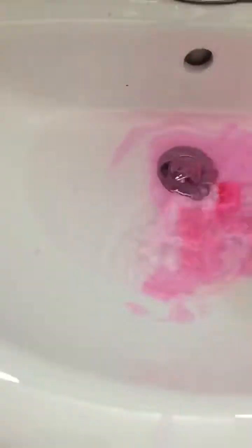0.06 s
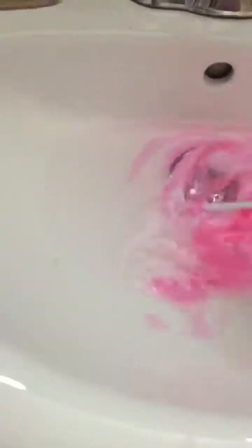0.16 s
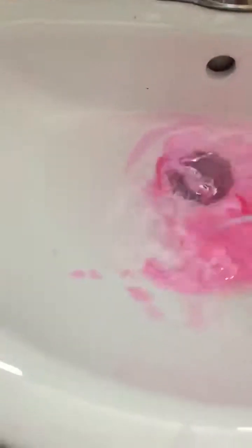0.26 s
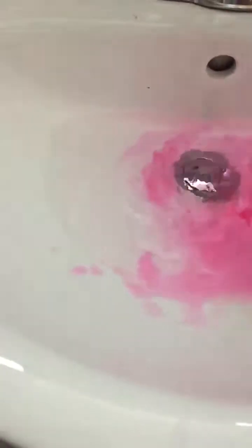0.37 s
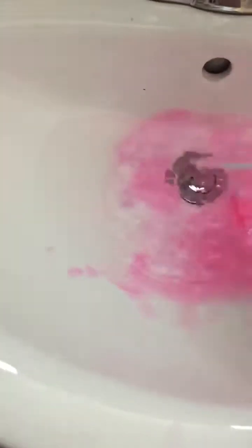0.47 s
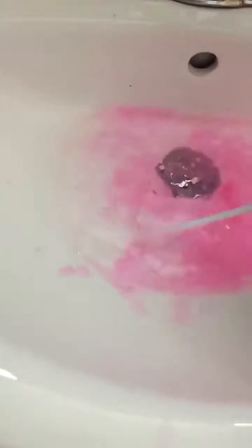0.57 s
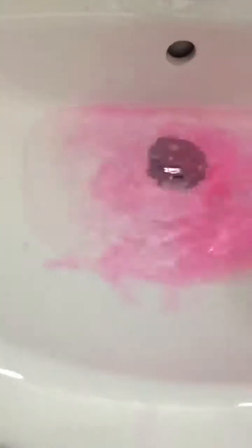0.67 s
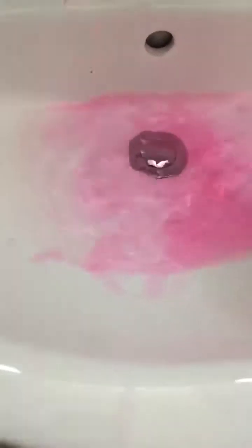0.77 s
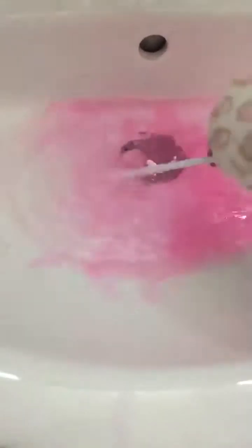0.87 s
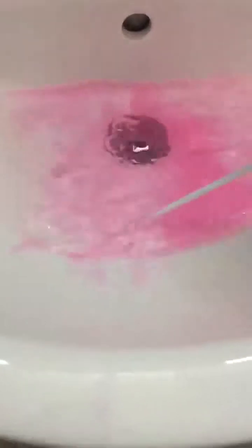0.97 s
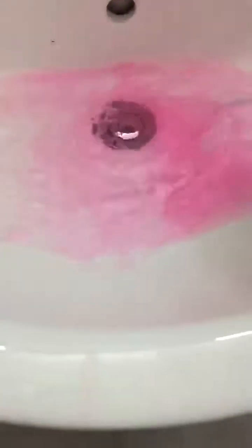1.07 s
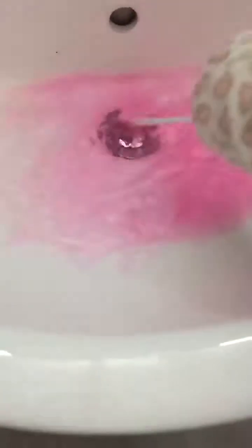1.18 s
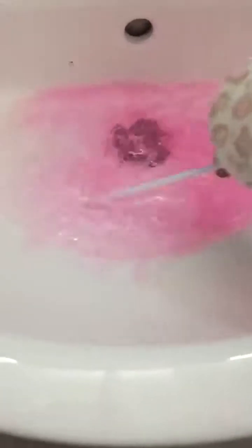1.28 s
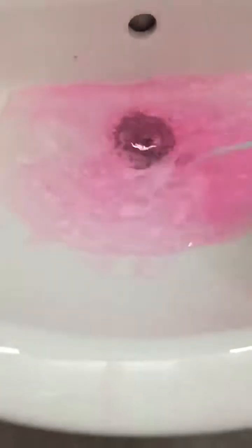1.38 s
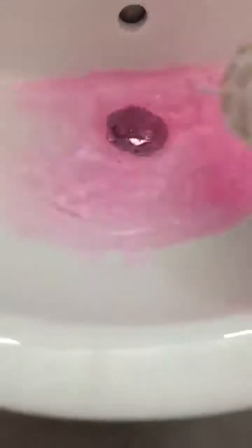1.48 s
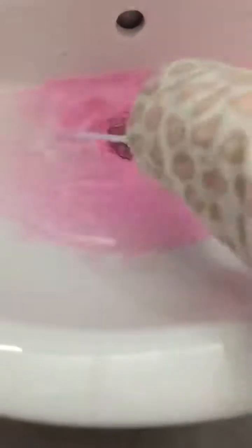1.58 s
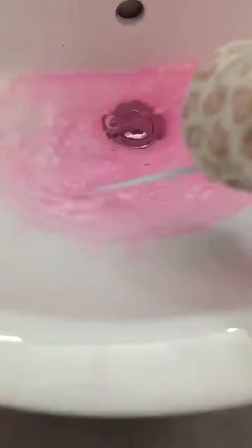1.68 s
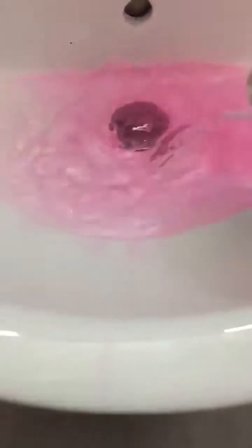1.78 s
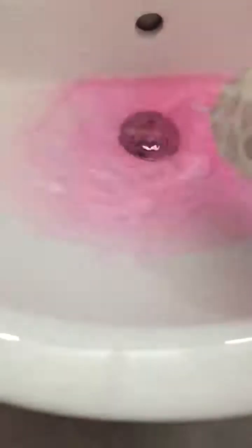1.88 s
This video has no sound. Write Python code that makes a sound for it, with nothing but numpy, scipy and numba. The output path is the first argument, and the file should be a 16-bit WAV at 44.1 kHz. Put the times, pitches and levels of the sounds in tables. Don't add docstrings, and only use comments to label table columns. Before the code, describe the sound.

Close phone pickup of water splashing in a bathroom basin: a crack and plops early, then clusters of bubbly bloops, short slosh and fizz, ending in sparse small drips, with slight tiled-room echo and faint hum.

```python
import sys
import numpy as np
from scipy import signal
from scipy.fft import rfft, irfft
from scipy.io import wavfile
from numba import njit

SR = 44100
rng = np.random.default_rng(int(sys.argv[2]) if len(sys.argv) > 2 else 0)


def transcribe(u):
    v = np.clip(np.atleast_2d(u).T, -1, 1)
    q = np.round(v * 32767).astype(np.int16)
    wavfile.write(sys.argv[1], SR, q)


def gain_from_db(level_db):
    decades = np.asarray(level_db, float) / 20
    return 10 ** decades


N = 85995


def band(x, hz, octaves):
    edges = np.clip(hz * 2 ** (np.array([-octaves, octaves]) / 2), 20, SR * 0.45)
    return signal.sosfilt(signal.butter(2, edges, "bandpass", fs=SR, output="sos"), x)


def unit(x):
    return x / np.sqrt(np.mean(x ** 2))


def add(out, start_s, piece):
    i = max(int(start_s * SR), 0)
    out[i:i + len(piece)] += piece[:N - i]


def blur(count, width_hz):
    settle = 2000
    low_pass = signal.butter(2, width_hz / 2, fs=SR, output="sos")
    a, b = signal.sosfilt(low_pass, rng.standard_normal((2, count + settle)))[:, settle:]
    return (a + 1j * b) / np.sqrt(2 * width_hz / SR)


@njit
def grains(count, start, hz, size, cycles, rise, rate):
    out = np.zeros(count)
    for k in range(len(start)):
        n, phase = cycles[k] * rate / hz[k], 0.
        for j in range(min(int(2 * n), count - start[k])):
            phase += 2 * np.pi * min(hz[k] * (1 + rise[k] * j / n) / rate, 0.45)
            attack = 1 - np.exp(-j * 3 * hz[k] / rate)
            out[start[k] + j] += size[k] * np.exp(-3.45 * j / n) * attack * np.sin(phase)
    return out


def ring(start_s, pitch_hz, level_db, cycles, rise):
    start = (start_s * SR).astype(np.int64)
    return grains(N, start, 1. * pitch_hz, gain_from_db(level_db), cycles + 0 * pitch_hz, rise + 0 * pitch_hz, 1. * SR)


# pitch_hz [Hz], level_db [dB per Hz]
HUM_SPECTRUM = [
    (15, -33),
    (25, -7),
    (2500, -4),
    (4800, -10),
    (7310, -13),
    (11600, -9),
    (16000, -22),
]


def hum():
    f = np.maximum(np.fft.rfftfreq(N, 1 / SR), 1)
    hz, level_db = np.array(HUM_SPECTRUM).T
    colour = gain_from_db(np.interp(np.log(f), np.log(hz), level_db))
    return unit(irfft(rfft(rng.standard_normal(N)) * colour, N)) * gain_from_db(-63)


# start_s [s], length_s [s], strength_db [dB],
# depth_octaves [octaves the bubbles sink], spray_db [dB]
SURGES = [(0.03, 0.025, -44, -0.47, 0.1), (0.21, 0.043, -38, 0.14, .1), (.27, .03, -40, .1, .1),
          (0.371, 0.082, -41, -0.24, .1), (0.575, 0.03, -41, -.3, .1), (.61, .06, -35, -.2, .1),
          (0.716, 0.03, -51, -0.33, .1), (.915, 0.04, -34, 0.58, -2), (.96, .058, -31, .3, .1),
          (1.075, 0.045, -50, 0.094, .1), (1.262, .065, -37, -0.1, -4), (1.352, .035, -32, -.7, -8),
          (1.42, .07, -42, -.2, -5), (1.59, 0.085, -42, 0.034, .1), (1.805, 0.055, -44, -0.19, .1)]


def stirring():
    rise_s, fall_s = 0.008, 0.016
    trickle_power, trickle_depth, trickle_spray_db = gain_from_db(2 * -57), -0.7, 6
    t = np.arange(N) / SR
    start_s, length_s, strength_db, depth, spray_db = np.array(SURGES).T[:, :, None]
    attack = np.clip((t - start_s) / rise_s, 0, 1) ** 2
    decay = np.exp(-np.maximum(t - start_s - length_s, 0) / fall_s)
    power = gain_from_db(2 * strength_db) * attack * decay
    total = power.sum(0) + trickle_power
    mean_depth = ((power * depth).sum(0) + trickle_power * trickle_depth) / total
    mean_spray_db = ((power * spray_db).sum(0) + trickle_power * trickle_spray_db) / total
    return 10 * np.log10(total), mean_depth, mean_spray_db


def rumble():
    hz, octaves = 137, 1.98
    strength_db, depth, _ = stirring()
    low = unit(band(band(rng.standard_normal(N), hz, octaves), hz, octaves))
    return low * (gain_from_db(-31.5 + strength_db + 8 * depth) + gain_from_db(-77))


def swarm(count, hz, octaves, cycles, scatter_db, depth):
    luck = np.clip(rng.standard_normal((count, 4)), -2.2, 2.2)
    at = (rng.random(count) * (N - 1)).astype(int)
    strength_db, stir_depth, _ = stirring()
    pitch_hz = np.clip(hz * 2 ** (octaves * luck[:, 0] - depth * stir_depth[at]), 300, 16000)
    level_db = scatter_db * luck[:, 3]
    overlap = np.mean(gain_from_db(2 * level_db) * cycles / pitch_hz) * count / (N / SR) / 14
    level_db = level_db - 10 * np.log10(overlap) + strength_db[at]
    return ring(at / SR, pitch_hz, level_db, cycles * 2 ** (0.5 * luck[:, 1]), 0.2 + 0.26 * luck[:, 2])


def slosh():
    strength_db, _, spray_db = stirring()
    small = gain_from_db(-3) * swarm(count=1100, hz=1500, octaves=0.603, cycles=14.2, scatter_db=5, depth=1)
    froth = gain_from_db(-12.5) * swarm(count=1500, hz=2900, octaves=0.45, cycles=11, scatter_db=5.5, depth=0)
    fizz = gain_from_db(-12) * swarm(count=2000, hz=7600, octaves=0.665, cycles=11, scatter_db=7, depth=0)
    flicker = gain_from_db(4.0 * unit(band(rng.standard_normal(N), 70, 3)))
    spray = gain_from_db(-20) * unit(band(rng.standard_normal(N), 5500, 2.4) * flicker)
    return small + froth + gain_from_db(spray_db) * (fizz + spray * gain_from_db(strength_db))


# start_s [s], length_s [s], first_hz [Hz], last_hz [Hz], level_db [dB]
HOLLOW_WHISTLES = [(0, .045, 2250, 2250, -52), (.045, .035, 2300, 2450, -42), (.075, .085, 2300, 1850, -50),
                   (.02, .045, 3700, 3600, -52), (.745, .025, 1000, 1600, -52),
                   (.765, .055, 1750, 1850, -44), (.79, .06, 2900, 3300, -56),
                   (1.105, .05, 2500, 1900, -47), (1.475, .04, 1250, 2100, -45),
                   (1.51, .05, 1800, 1800, -50), (1.55, .04, 2000, 2250, -47),
                   (1.655, .03, 3100, 2600, -46), (1.665, .04, 1300, 1250, -45),
                   (1.77, .03, 4400, 4300, -46)]


def hollows():
    width_hz, edge = 260, 0.25
    out = np.zeros(N)
    for start_s, length_s, first_hz, last_hz, level_db in HOLLOW_WHISTLES:
        u = np.linspace(0, 1, int(length_s * SR))
        phase = 2 * np.pi * np.cumsum(first_hz + (last_hz - first_hz) * u) / SR
        shape = np.clip(np.minimum(u, 1 - u) / edge, 0, 1)
        whistle = np.real(blur(len(u), width_hz) * np.exp(1j * phase))
        add(out, start_s, gain_from_db(level_db) * shape * whistle)
    return out


# start_s [s], length_s [s], first_hz [Hz], last_hz [Hz], peak_db [dB]
AIR_POCKETS = [(0.035, 0.018, 640, 820, -40), (0.056, 0.026, 814, 1110, -43),
               (0.181, 0.035, 726, 1080, -49.5), (.209, 0.014, 985, 1330, -18.5),
               (0.345, 0.017, 630, 650, -41.5), (.370, 0.017, 652, 670, -29.5),
               (0.377, 0.023, 902, 990, -33), (0.375, 0.018, 1264, 2330, -40),
               (0.403, 0.021, 1242, 2310, -28), (0.634, .013, 1865, 2840, -27),
               (.866, 0.023, 614, 870, -40.5), (0.869, 0.021, 2403, 1980, -51),
               (0.899, 0.024, 1082, 1675, -26), (.900, 0.019, 670, 1284, -25),
               (0.929, 0.017, 760, 900, -27.5), (1.3565, .006, 2600, 3700, -15),
               (1.008, .018, 700, 620, -27), (.975, 0.016, 514, 514, -19), (0.996, 0.022, 543, 773, -28.5),
               (1.030, 0.014, 474, 546, -40), (1.075, 0.037, 888, 2240, -48),
               (1.223, .038, 607, 1174, -38.5), (1.734, 0.059, 497, 710, -47),
               (1.807, 0.02, 908, 1083, -35)]


def pockets():
    attack_s, close_s, fade_db, bend, flutter_db = 0.0008, 0.001, -2, 1.478, 2.5
    out = np.zeros(N)
    flutter = unit(band(rng.standard_normal(N), 125, 1.35))
    for start_s, length_s, first_hz, last_hz, peak_db in AIR_POCKETS:
        t = np.arange(int((length_s + 0.0102) * SR)) / SR
        u = np.clip(t / length_s, 0, 1)
        shape = np.clip(t / attack_s, 0, 1) * np.exp(-np.maximum(t - length_s, 0) / close_s)
        wobble = np.resize(flutter[int(start_s * SR):], len(t))
        glide_hz = first_hz + (last_hz - first_hz) * u ** bend
        phase = 2 * np.pi * np.cumsum(glide_hz * (1 + 0.01 * wobble[::-1])) / SR
        level = gain_from_db(peak_db + fade_db * u + flutter_db * wobble)
        add(out, start_s, level * shape * np.sin(phase))
    return out


# start_s [s], peak_db [dB], pitch_hz [Hz]
DROPLETS = [(0.0377, -25.5, 6700), (0.453, -26.5, 12300), (0.5136, -18.5, 6050), (0.6498, -22.5, 8700),
            (0.6665, -25.5, 4720), (0.7385, -26, 11900), (0.8419, -36, 11700), (0.9307, -30, 8990),
            (0.9382, -24.5, 5060), (1.064, -28, 10900), (1.092, -39, 4530), (1.1115, -25, 5940),
            (1.2036, -26, 8930), (1.3017, -22, 4830), (1.3634, -17, 7200), (1.5237, -34, 11400),
            (1.5924, -28, 9300), (1.6064, -30.5, 8870), (1.615, -24, 5980), (1.769, -26, 3950),
            (1.816, -31, 3920), (1.8584, -33.5, 4540), (1.932, -24, 4670)]


def droplets():
    start_s, peak_db, pitch_hz = np.array(DROPLETS).T
    out = ring(start_s, pitch_hz, peak_db, 22, 0.018)
    t = np.arange(400) / SR
    for start_s, peak_db, pitch_hz in DROPLETS:
        noise = rng.standard_normal(len(t)) * np.exp(-t / 0.0032)
        tick = band(band(noise, pitch_hz * 0.58, 1.2), pitch_hz * 2.2, 2.8)
        add(out, start_s, gain_from_db(peak_db - 7) * tick)
    return out


# start_s [s], pitch_hz [Hz], peak_db [dB], cycles [count to fade 30 dB]
SINGLE_BUBBLES = [(0.056, 3600, -36, 22), (0.974, 2430, -17, 10), (1.301, 2320, -24, 8),
                  (1.47, 700, -32, 16), (1.583, 2300, -35, 10), (.228, 910, -18, 6.7),
                  (0.235, 1500, -16.5, 5.5), (.370, 1550, -24.5, 16), (0.402, 2000, -8, 10.4),
                  (.427, 2450, -21.5, 30), (.446, 1243, -32.5, 20), (.471, 1800, -22, 8.5),
                  (0.584, 1280, -31, 19), (.599, 1460, -22, 4.6), (0.61, 2468, -7, 16),
                  (0.634, 1012, -17.5, 15), (.678, 1785, -23, 13.6), (0.787, 1780, -32, 24),
                  (1.26, 1137, -15, 17), (1.27, 1830, -24, 13), (1.288, 841, -17.5, 9.6),
                  (1.319, 1600, -18.5, 30), (1.356, 2315, -8, 16), (.944, 1000, -23, 9),
                  (.954, 780, -21, 9), (.962, 950, -20, 9), (1.643, 900, -31, 14), (1.426, 2210, -20, 21),
                  (1.442, 1720, -16.5, 13), (1.452, 710, -27.5, 16.3), (1.594, 1095, -20, 21.3),
                  (1.607, 3000, -14.5, 7.7), (1.621, 1500, -24, 8.3), (1.698, 900, -31, 21),
                  (1.809, 1610, -23, 4.8), (1.858, 2050, -35, 22)]


def bubbles():
    start_s, pitch_hz, peak_db, cycles = np.array(SINGLE_BUBBLES).T
    return ring(start_s, pitch_hz, peak_db, cycles, 0.098)


# pitch_hz [Hz], level_db [dB], t60_s [s]
BASIN_MODES = [
    (1349, 2.5, 0.099),
    (3300, -10, 0.08),
    (4430, -2, 0.19),
    (5520, -8, 0.06),
    (7800, -20, 0.06),
    (9400, -20, 0.06),
]
# start_s [s], peak_db [dB], centre_hz [Hz], ring_db [dB of basin ring]
GLAZE_SPLASHES = [(0.21, -30, 5000, -9), (0.2701, -2, 9000, -4), (0.3999, -26.5, 4000, -22),
                  (0.472, -27, 2500, 3), (0.578, -39, 4000, -4), (0.6105, -9, 4500, -9),
                  (0.9737, -5.5, 7500, -9), (1.003, -14.5, 5000, -4), (1.3178, -11, 3800, -5),
                  (1.357, -33, 3000, -9), (1.375, -20, 4000, -27), (1.423, -37, 6000, 4),
                  (1.4431, -25.5, 5000, 1)]


def splashes():
    crack_s, hiss_s = 0.00083, 0.018
    out, t = np.zeros(N), np.arange(int(0.3 * SR)) / SR
    rise = np.clip(t / 0.0011, 0, 1)
    for start_s, peak_db, centre_hz, ring_db in GLAZE_SPLASHES:
        crack = band(rng.standard_normal(len(t)) * rise * np.exp(-t / crack_s), centre_hz, 2.7)
        hiss = unit(band(rng.standard_normal(len(t)), 5000, 2.5)) * rise * np.exp(-t / hiss_s)
        tone = np.zeros(len(t))
        for pitch_hz, level_db, t60_s in BASIN_MODES:
            wave = (0.6 + blur(len(t), 70)) * np.exp(2j * np.pi * pitch_hz * t)
            tone += gain_from_db(level_db) * 1000 ** (-t / t60_s) * np.real(wave)
        splash = crack / np.abs(crack).max() + gain_from_db(-33) * hiss + gain_from_db(-22 + ring_db) * tone
        add(out, start_s, gain_from_db(peak_db) * splash)
    return out


# start_s [s], peak_db [dB], centre_hz [Hz]
GLAZE_TICKS = [(.2274, -28, 5100), (.229, -32, 6600), (.3691, -38, 11400), (.378, -40, 11500),
               (.391, -42, 13500), (.401, -30, 14000), (.4125, -31, 10000), (.4364, -41, 10200),
               (.447, -38, 4600), (.4525, -27, 8500), (.465, -33, 11500), (.482, -34, 14000),
               (.497, -40, 13000), (.5835, -35, 12500), (.591, -36, 8500), (.5995, -31, 7500),
               (.630, -28, 7000), (.668, -30, 9000), (.680, -32, 5600), (.912, -36, 3400),
               (.945, -34, 6200), (.9607, -27, 7520), (.995, -27, 2500), (1.0135, -28, 2500),
               (1.101, -39, 6500), (1.1114, -32, 14300), (1.137, -38, 4200), (1.205, -31, 13000),
               (1.2245, -37, 11000), (1.270, -36, 9000), (1.301, -34, 11000), (1.388, -31, 9000),
               (1.4242, -31, 11900), (1.426, -32, 4700), (1.4411, -30, 9000), (1.492, -35, 4300),
               (1.587, -36, 9500), (1.676, -41, 4800), (1.8577, -36, 7850)]


def ticks():
    out, t = np.zeros(N), np.arange(400) / SR
    for start_s, peak_db, centre_hz in GLAZE_TICKS:
        tick = band(rng.standard_normal(len(t)) * np.exp(-t / 0.0012), centre_hz, 0.6)
        add(out, start_s, gain_from_db(peak_db) * tick / np.abs(tick).max())
    return out


def room(x):
    t60_s, treble_hz = 0.22, 5000
    t = np.arange(int(0.5 * SR)) / SR
    noise = rng.standard_normal(len(t))
    low = signal.sosfilt(signal.butter(1, treble_hz, fs=SR, output="sos"), noise)
    tail = low * 1000 ** (-t / t60_s) + (noise - low) * 1000 ** (-t / (0.2 * t60_s))
    tail *= t > 0.001
    return signal.fftconvolve(x, tail / np.sqrt(np.sum(tail ** 2)))[:N]


def scene():
    water = slosh() + hollows() + pockets() + droplets() + bubbles() + splashes() + ticks()
    water = signal.sosfilt(signal.butter(2, 535, "highpass", fs=SR, output="sos"), water)
    return (water + gain_from_db(-12) * room(water) + rumble() + hum())[None]


def band_limit(x):
    return signal.sosfilt(signal.butter(12, 17150, fs=SR, output="sos"), x)


def record(dry):
    mix = signal.sosfilt(signal.cheby1(10, 0.5, 15600, fs=SR, output="sos"), dry)
    return band_limit(mix)


dry = scene()
out = record(dry)
transcribe(out)
```